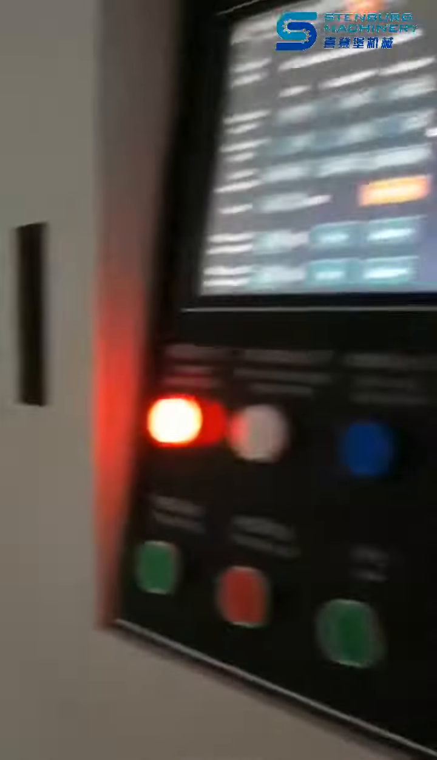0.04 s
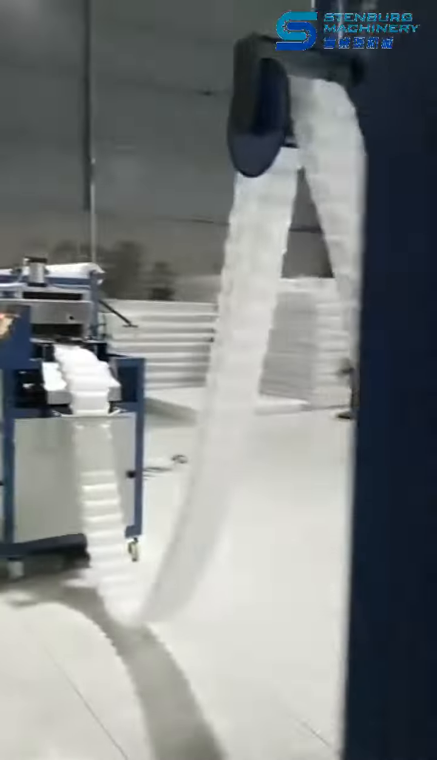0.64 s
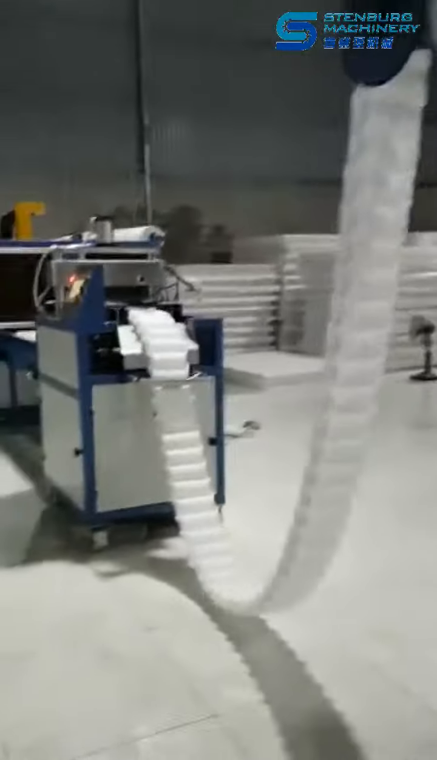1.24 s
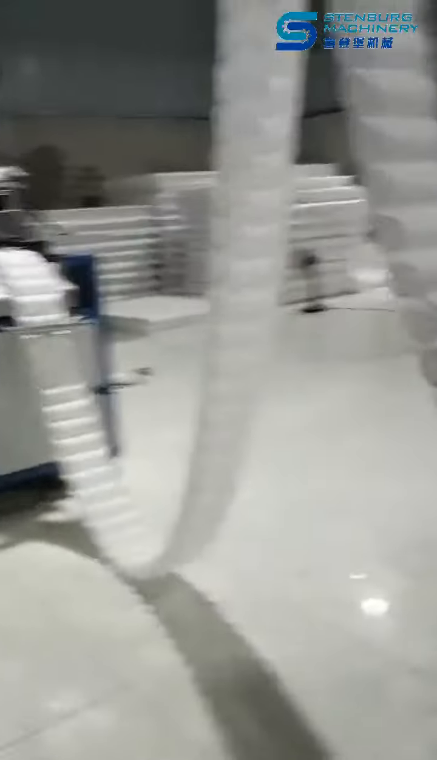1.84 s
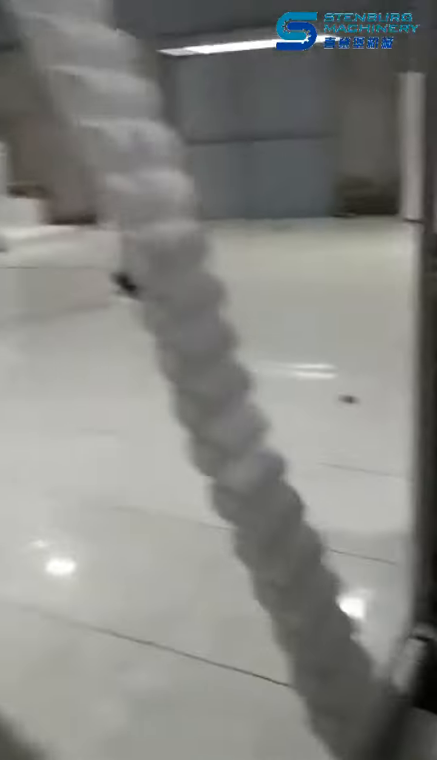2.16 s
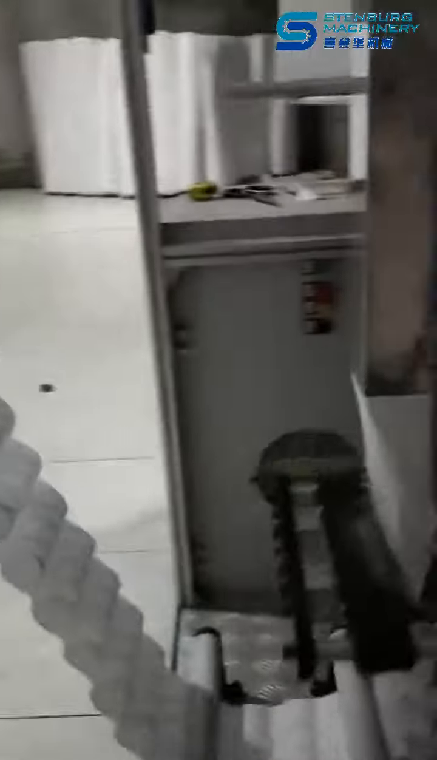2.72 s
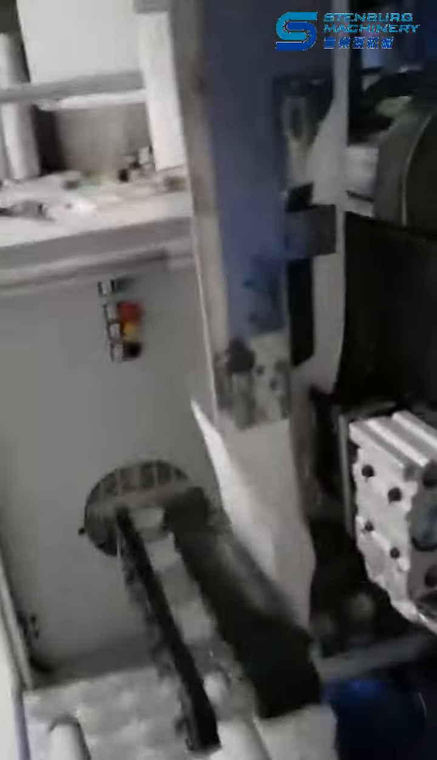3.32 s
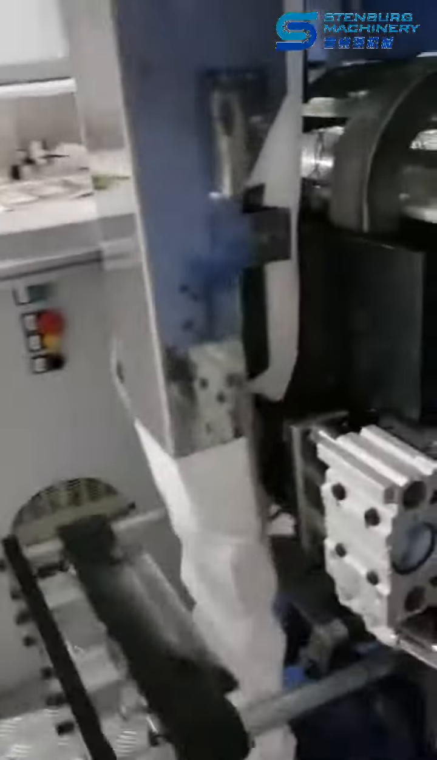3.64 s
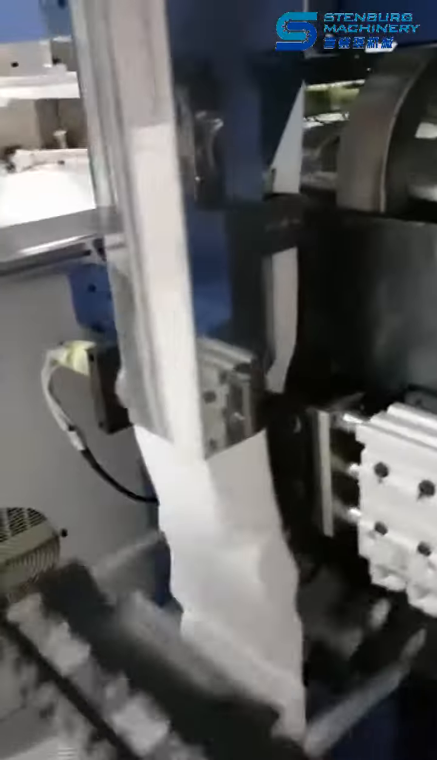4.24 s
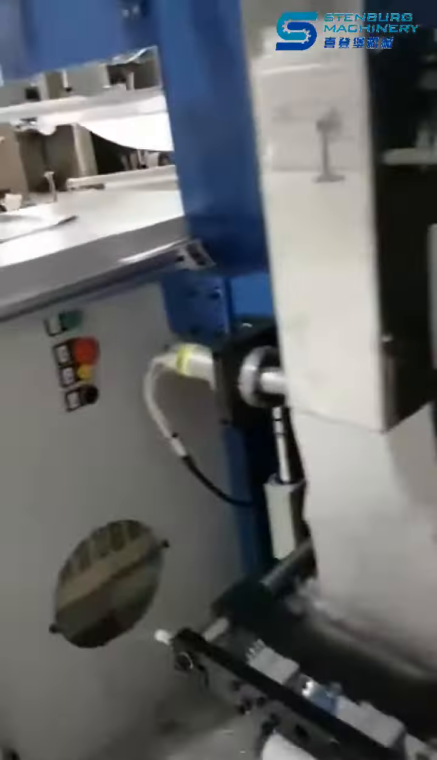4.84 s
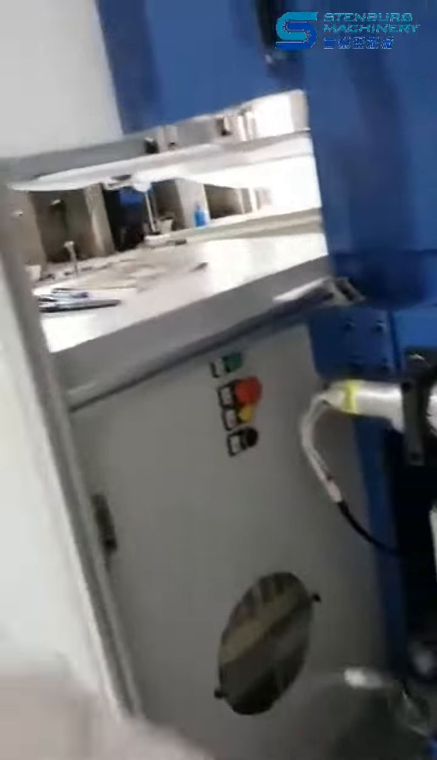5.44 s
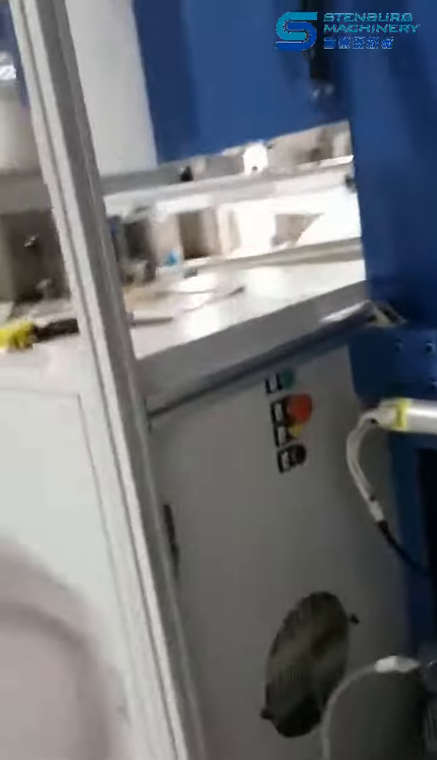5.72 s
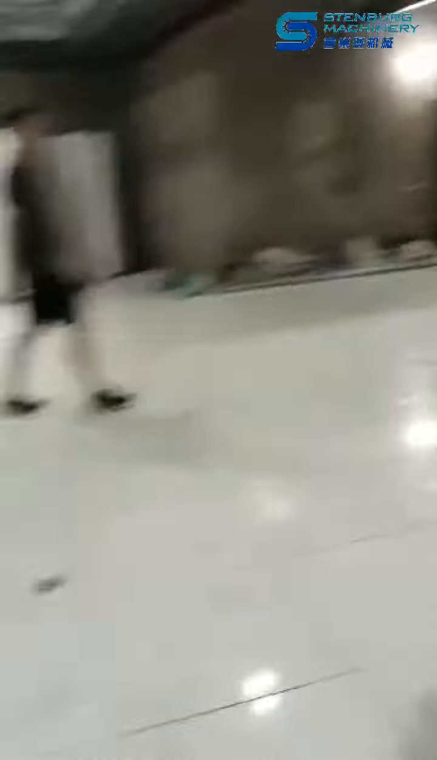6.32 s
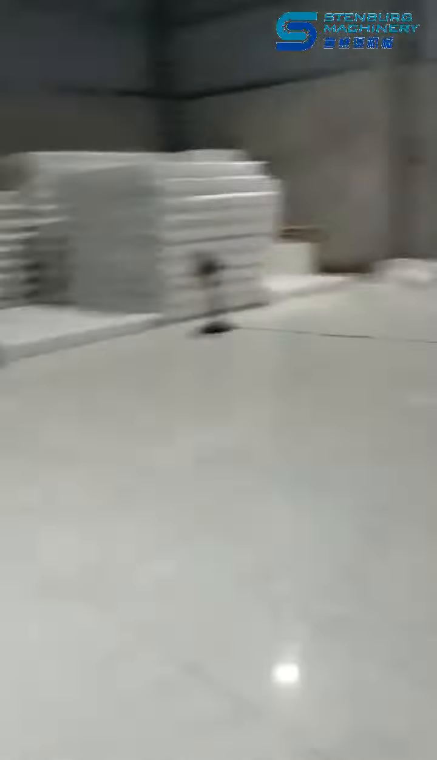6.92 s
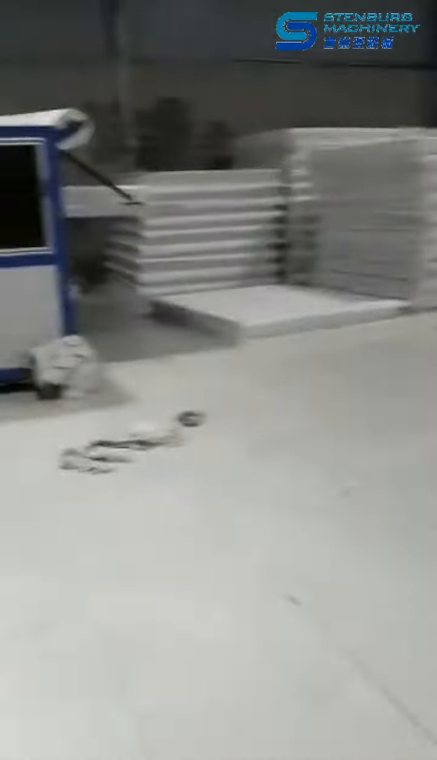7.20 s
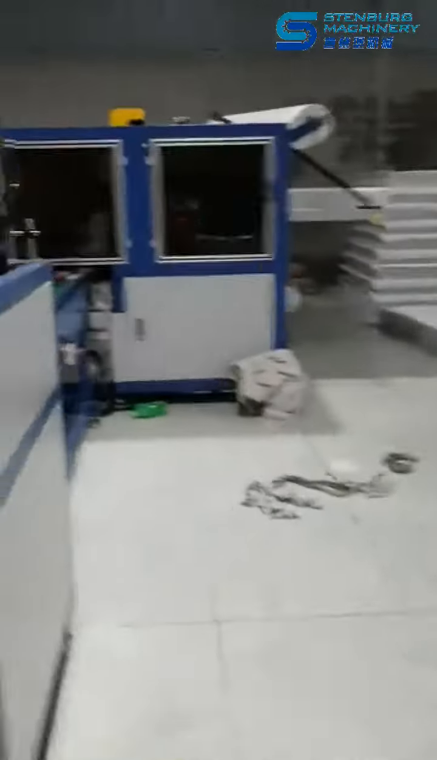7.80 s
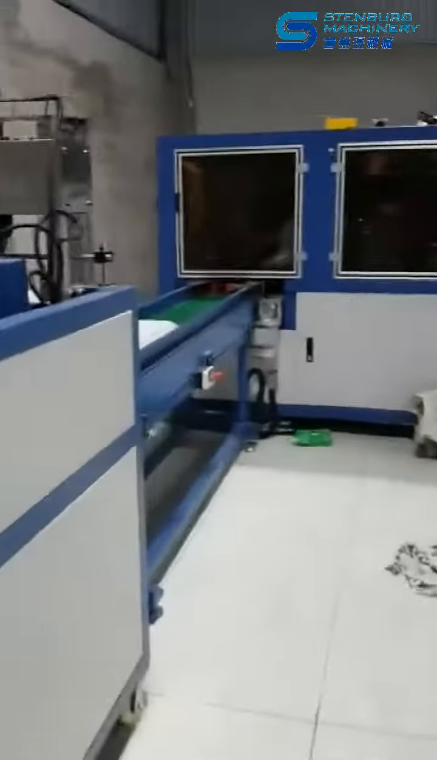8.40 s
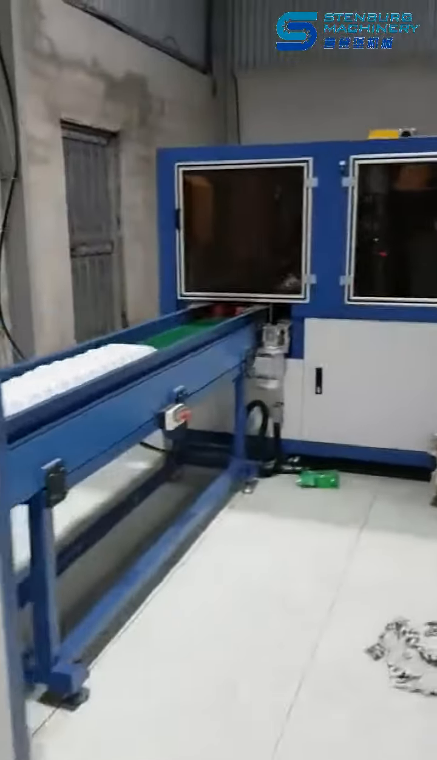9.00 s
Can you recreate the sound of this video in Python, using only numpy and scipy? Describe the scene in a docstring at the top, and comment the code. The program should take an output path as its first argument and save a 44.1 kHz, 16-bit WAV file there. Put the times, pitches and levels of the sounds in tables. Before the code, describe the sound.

A production line thumps about three times a second over steady motor noise, with metallic clatter and short bursts of air.

```python
"""The din of a hard-walled factory hall, from two microphones 15 cm apart carried past a pocket-spring line.
Close by, chains and fabric rustle, panels drone and motors whine. About three times a second the drive
speeds up and stops, and the welding head thuds on the frame and rolls around the hall. Valves puff air,
and on about every second stroke a spring clacks into its steel chute. Farther along, the bass flutters
after the strokes, thin chirps poke through the treble and a few footfalls boom on the concrete."""
import sys
import numpy as np
from scipy import signal
from scipy.fft import rfft, irfft, next_fast_len
from scipy.io import wavfile
from scipy.ndimage import uniform_filter1d

SR = 44100
rng = np.random.default_rng(int(sys.argv[2]) if len(sys.argv) > 2 else 0)


def to_wav(s):
    """Save 16-bit WAV."""
    ch = np.atleast_2d(s).T  # columns
    pcm = np.round(np.clip(ch, -1, 1) * 32767)  # PCM
    wavfile.write(sys.argv[1], SR, pcm.astype(np.int16))


N = 399546
TIME = np.arange(N) / SR
FFT_SIZE = 1024
BIN_HZ = np.maximum(np.arange(FFT_SIZE // 2 + 1) * SR / FFT_SIZE, 20)
MIC_SPACING_M, HALL_T60_S = .15, 0.88
LEAVE_PANEL_S, LEAVE_HEAD_S = (1.43, 1.8), (4.3, 5.5)   # walking off from control panel and welding head
CYCLE_S, FIRST_CYCLE_S, STOPS_S = .684, .495, (0.302, 0.68)   # the drive stops twice in each cycle
DRIVE_EFFORT, FEED_EFFORT = (0.94, 0.59), (1, 0.8)   # stroke one pulls the fabric, two brings the spring
LEAD_S = .07   # from the start of a swell to its height

# Levels in the tables are relative; each source sets its own gain on top.
# loudness along the walk: time_s, rumble_db, drone_db, feed_db
WALK_LEVELS = [(0.0, -37.5, -32.5, -32), (0.6, -39, -33, -33.5), (1.25, -41.5, -30.5, -34),
               (1.7, -45, -41, -38.5), (2.4, -47, -38.5, -41.5), (3.5, -47.5, -41, -43.5),
               (4.4, -49, -44.5, -44.5), (5.3, -53.5, -41.5, -45), (6.0, -53, -45.5, -47.5),
               (6.55, -51, -44, -45.5), (7.05, -52, -44.5, -44.5), (7.6, -47.5, -40.5, -41.5),
               (8.6, -47, -40.5, -37.5), (9.06, -46.5, -40, -39)]
# how far the nearest machine's strokes stand out of the din: time_s, presence_factor
STROKE_PRESENCE = [(0, 0.67), (0.7, 0.53), (1.4, 1.1), (2.2, 1.22), (3.4, 1.06), (4.5, 1.53), (6.0, 1.25),
                   (6.9, 0.74), (7.5, 0.32), (9.06, 0.65)]
# deeper rests after some strokes: centre_s, feed_db, frame_db, width_s
STROKE_LULLS = [(.26, -0.5, -1, 0.019), (.885, -1, 0, 0.02), (1.03, -3.5, -0.5, 0.093),
                (1.24, -1.5, 0.5, .02), (1.805, -2.5, -4, 0.017), (2.255, -5, -4.5, .02),
                (2.915, -2.5, 2.5, 0.029), (3.29, -1, -1, 0.019), (3.6, -0.5, -2, .029),
                (4.3, 2, 1.5, 0.028), (4.66, -1, -2.5, 0.037), (4.965, -1.5, 2, .025),
                (5.33, -1, -4, 0.028), (5.68, -1.5, -2, 0.022), (6.03, -1, -0.5, 0.059),
                (6.69, -1, -2.5, 0.037), (7.03, -3.5, -0.5, 0.046), (7.72, -2.5, -3.5, 0.024),
                (8.41, -4, -2, 0.03)]
# low and high din beside the machine, out on the floor and down the line: frequency_hz, density_db
LOW_DIN_BESIDE = [(15, -54), (25, -31), (86, -13.5), (167, -10), (199, 10), (244, -13.5), (325, 1.5),
                  (381, -10.5), (468, -1.5), (584, -3.5), (652, -15), (814, -9.5), (954, -12), (1100, -10),
                  (1430, -51), (2420, -120)]
LOW_DIN_FLOOR = [(15, -51), (25, -26), (54, -26), (86, -14), (140, -4.5), (167, -5), (260, 0.5),
                 (296, -1.5), (330, -0.5), (387, -3), (460, 1), (593, -8.5), (752, -8), (814, -10),
                 (1100, -7), (1430, -46), (2420, -120)]
LOW_DIN_DOWN_LINE = [(15, -54), (25, -35), (75, -18.5), (113, -6), (172, -6.5), (205, -8.5), (250, -4.5),
                     (293, -0.5), (330, -3.5), (400, -1.5), (477, 0), (551, -3.5), (618, -7.5), (813, -8.5),
                     (957, -9), (1200, -13), (1560, -45)]
HIGH_DIN_BESIDE = [(500, -25), (850, 0), (1000, -0.5), (1200, -2), (1290, 0.5), (1850, -3), (2100, -0.5),
                   (2300, -4.5), (2640, -3.5), (2890, -8), (3400, -11.5), (4070, -5.5), (4660, -11),
                   (6170, -8.5), (7400, -12), (9620, -59), (16300, -120)]
HIGH_DIN_FLOOR = [(500, -27), (850, 12), (956, 3), (1140, -4.5), (1460, -5), (1840, -6), (1990, -3.5),
                  (2940, -11), (3190, -14), (4260, -10), (5590, -15.5), (6120, -12.5), (7400, -14),
                  (9620, -55.5), (16300, -120)]
HIGH_DIN_DOWN_LINE = [(470, -34), (800, 7), (1090, -8), (1840, -8), (2000, -7.5), (2670, -10),
                      (3190, -11.5), (4330, -10), (4630, -13.5), (4990, -11), (5630, -15), (6180, -12),
                      (7450, -16.5), (9680, -50), (16400, -120)]
# modes of the frame and its panels: pitch_hz, level_db, t60_s
PANEL_MODES = [(63.4, -25.5, 0.1), (114.5, -12, 0.58), (179, -12, 0.24), (202.3, -2.5, 0.13),
               (246, 0, 0.16), (338, 0, 0.066), (413, 3.5, 0.029), (459.6, 5.5, 0.04), (558, 2, 0.034),
               (672, 1, 0.031), (820, -1.5, 0.085)]
# motor and gear tones met on the walk: pitch_hz, level_db, wander_hz, nearest_s, width_s
MOTOR_TONES = [(84.5, -55.5, 3, 1.9, 1.6), (469.3, -56, 16, 5.0, 5.4), (456, -42, 5, 3.42, .09),
               (465, -45, 5, 2.77, .1), (805, -58, 4.6, 1.1, 3.7), (1468, -51.5, 6.3, 0.52, 1.1),
               (1464, -60, 6, 4.2, 1.2), (476, -40, 14, 2.5, .05), (462, -44, 16, 3.8, .06),
               (329, -46.5, 11, 1.55, .7), (476, -37, 9, 1.05, .2), (6130, -58, 90, 7.9, 1.3)]
# welding head blows and the drive's load before each: peak_s, level_db, rise_s, decay_s, pitch_hz, load_db
WELD_BLOWS = [(0.08, -27, 0.0066, 0.044, 139, 0), (0.468, -19.5, 0.012, 0.015, 217, 2),
              (0.747, -23.5, 0.0026, 0.021, 214, -0.5), (1.157, -21.5, 0.0031, 0.026, 220, -0.5),
              (1.379, -26, 0.0028, 0.0093, 440, -4), (1.445, -25.5, 0.0079, 0.023, 344, -3),
              (1.862, -27.5, 0.03, 0.016, 225, 5), (2.143, -30, 0.022, 0.023, 200, 0.5),
              (2.496, -33, 0.019, 0.013, 453, 0), (2.841, -37, 0.013, .014, 181, -4),
              (3.192, -32, 0.0071, 0.0089, 300, -0.5), (3.504, -33.5, 0.026, 0.025, 246, -2),
              (3.903, -31.5, 0.003, 0.0048, 850, 1.5), (4.207, -36, 0.017, 0.011, 210, -3),
              (4.555, -32, 0.01, 0.012, 423, 0.5), (4.887, -37, 0.029, 0.023, 176, -4),
              (5.242, -29.5, .006, 0.0056, 536, 1.5), (5.555, -37, 0.0041, 0.022, 308, -0.5),
              (5.924, -30, 0.0058, 0.0041, 397, 4), (6.234, -34, 0.016, 0.019, 330, -1),
              (6.603, -50, .01, 0.0061, 480, 6), (6.915, -34, 0.0027, 0.0073, 404, 0),
              (7.305, -34, 0.013, 0.03, 397, 1.5), (7.578, -31.5, 0.0037, 0.015, 387, 1),
              (8.013, -33.5, 0.0063, 0.019, 368, 1.5), (8.28, -31, 0.0067, .01, 320, 3),
              (8.616, -39, 0.0064, .012, 367, 3.5)]
# rasps as a valve vents or the fabric is jerked on: peak_s, level_db, width_s
AIR_PUFFS = [(0.125, -27.5, 0.014), (0.615, -30.5, 0.023), (1.985, -33, 0.018), (2.15, -47, 0.018),
             (2.66, -35.5, 0.014), (3.355, -41, 0.014), (3.49, -37, 0.035), (3.932, -44, 0.011),
             (4.035, -34, 0.01), (4.145, -40, 0.022), (4.606, -44, 0.0073), (4.545, -40, 0.018),
             (4.715, -41, 0.012), (4.87, -40, 0.033), (5.405, -44, .016), (5.72, -46, 0.013),
             (5.812, -53, .01), (6.085, -44, 0.011), (6.4, -43.5, 0.031), (7.645, -40, .013)]
# chain carriers knocking on a panel: peak_s, level_db, pitch_hz
CARRIER_KNOCKS = [(0.318, -30.5, 584), (0.478, -30, 800), (0.700, -29, 587), (0.347, -31.5, 457),
                  (0.438, -28, 468), (1.118, -28, 458), (1.620, -36.5, 242), (1.833, -29.5, 300),
                  (1.942, -31, 322), (2.098, -33, 430), (2.555, -35, 272), (2.823, -34.5, 470),
                  (4.820, -38, 430), (5.125, -40.5, 240), (5.164, -41, 450), (5.546, -33, 489),
                  (5.797, -38, 484), (6.462, -38.5, 500), (6.606, -38, 446), (7.470, -41, 333),
                  (7.965, -41, 215), (8.116, -35.5, 473), (8.245, -41, 200), (8.769, -35, 533)]
# springs landing in the chute: start_s, length_s, scrape_db, then three pairs of pitch_hz, level_db
SPRING_LANDINGS = [(0.496, 0.042, -32.5, 2100, -39, 4170, -40, 7200, -36),
                   (1.168, 0.032, -32, 2020, -37, 2500, -49, 3563, -41),
                   (1.285, 0.028, -35.5, 2180, -38, 2480, -48, 4080, -40),
                   (1.573, 0.045, -38, 2174, -37, 3530, -43, 3980, -41),
                   (1.856, 0.022, -29.5, 2029, -39, 3610, -33, 4480, -35.5),
                   (2.543, 0.017, -32.5, 3610, -31.5, 2020, -41.5, 4370, -42),
                   (3.23, .014, -33, 2570, -42, 3630, -37.5, 4040, -41),
                   (3.922, 0.011, -41.5, 1450, -47, 3220, -48, 3730, -49),
                   (4.602, 0.008, -40.5, 1884, -46, 2440, -44, 6438, -61),
                   (5.274, 0.023, -44, 2030, -45, 2900, -53, 7150, -46),
                   (5.938, 0.0067, -62, 3730, -54, 3800, -46, 4000, -52),
                   (5.966, 0.011, -44.5, 820, -43, 2160, -50, 7200, -50.5),
                   (6.653, 0.0084, -56, 3900, -56, 6650, -50, 6850, -52),
                   (7.33, 0.026, -39.5, 980, -42, 2210, -43, 3601, -49),
                   (8.013, 0.027, -43, 2030, -48, 3680, -45, 6200, -51),
                   (8.707, 0.023, -40, 2050, -47, 2550, -45, 4130, -50)]
# modes of the steel chute: pitch_hz, level_db, t60_s
CHUTE_MODES = [(2030, -5, .04), (2540, -6, .04), (2950, -6, .04), (3620, -3, .04), (3780, -4, .04),
               (4110, -2, .04), (4320, -5, .035), (4540, -5, .035), (6680, -6, .04), (7100, -3, .04),
               (7330, -3, .04)]
# bass flutter along the walk: time_s, level_db
FLUTTER_LEVELS = [(0, -77.5), (1.3, -68.5), (1.58, -61), (2.4, -50), (2.9, -50.5), (5.1, -50.5), (5.7, -53),
                  (6.3, -54), (7.1, -67), (7.8, -79), (9.06, -50)]
# thin chirps as some strokes end: peak_s, level_db, pitch_hz, left_minus_right_db
HIGH_CHIRPS = [(2.866, -59, 8040, 25), (3.542, -57, 7900, -5), (4.574, -54, 7900, -24),
               (6.274, -63, 8000, 7), (6.622, -67, 7860, 6)]
# heavy steps on the concrete: start_s, level_db
FOOTFALLS = [(4.2, -51), (5.57, -54), (5.944, -55)]


def from_db(db):
    """Decibels to gain."""
    return 10 ** (np.asarray(db) / 20)


def unit_rms(x):
    """Scale to unit power."""
    return x / np.sqrt(np.mean(x ** 2) + 1e-20)


def unit_peak(x):
    """Scale so that the loudest 10 ms have unit power."""
    return x / np.sqrt(uniform_filter1d(np.mean(x ** 2, 0), size=441).max())


def gains(rows):
    """Each dB column of a curve as a gain per sample."""
    time_s, *columns = np.transpose(rows)
    return [from_db(np.interp(TIME, time_s, db)) for db in columns]


def spectrum(points):
    """A gain per frequency bin, read between points on a log axis."""
    hz, db = np.transpose(points)
    return from_db(np.interp(np.log(BIN_HZ), np.log(hz), db))


def band(x, low_hz, high_hz, order=2):
    """Causal band-pass."""
    return signal.sosfilt(signal.butter(order, [low_hz, high_hz], "band", fs=SR, output="sos"), x)


def low_pass(x, edge_hz):
    """A steep edge in the treble."""
    return signal.sosfilt(signal.ellip(14, .1, 80, edge_hz, fs=SR, output="sos"), x)


def add(out, start_s, sound):
    """Mix a sound in at start_s."""
    start = max(round(start_s * SR), 0)
    out[:, start:start + sound.shape[1]] += sound[:, :N - start]


def bell(age_s, width_s):
    """A smooth bump, 1 at age zero."""
    return np.exp(-(age_s / width_s) ** 2 / 2)


def burst(decay_s, rise_s):
    """A quarter second of contact force that builds quickly and dies away."""
    age = TIME[:SR // 4]
    return (1 - np.exp(-age / rise_s)) * np.exp(-age / decay_s)


def swell(rise_s, decay_s):
    """An envelope that builds roundly to its height LEAD_S in, then dies away."""
    age = TIME[:SR // 3] - LEAD_S
    return bell(np.minimum(age, 0), rise_s) * np.exp(-np.maximum(age, 0) / decay_s)


def wobble(points):
    """Drift of unit spread through random points spaced along the walk."""
    return unit_rms(np.interp(TIME, np.linspace(0, TIME[-1], points), rng.standard_normal(points)))


def diffuse(size=N):
    """Noise from all sides: alike at both microphones in the bass, unrelated in the treble."""
    padded = next_fast_len(size)
    hz = np.arange(padded // 2 + 1) * SR / padded
    alike = .975 * np.sinc(2 * hz * MIC_SPACING_M / 343)
    mid, side = rfft(rng.standard_normal((2, padded)))
    pair = np.sqrt(1 + alike) * mid + np.sqrt(1 - alike) * side * [[1], [-1]]
    return irfft(pair, padded)[:, :size] / np.sqrt(2)


def ring(force, modes):
    """Drive a set of decaying modes, with alternating signs."""
    out = 0
    for k, (hz, db, t60_s) in enumerate(modes):
        radius, angle = from_db(-60 / (t60_s * SR)), 2 * np.pi * hz / SR
        drive = [0, np.sin(angle) * np.sqrt(1 - radius ** 2)]
        feedback = [1, -2 * radius * np.cos(angle), radius ** 2]
        out = out + (-1) ** k * from_db(db) * signal.lfilter(drive, feedback, force + 1e-18)
    return out


def contacts(per_s, spread_db):
    """Random knocks, each reaching the two microphones from its own direction."""
    out, at = np.zeros((2, N)), np.flatnonzero(rng.random(N) < per_s / SR)
    strength = from_db(spread_db * np.minimum(rng.exponential(1, len(at)), 3))
    strength *= rng.choice([-1, 1], len(at))
    lag = (rng.uniform(-1, 1, len(at)) * MIC_SPACING_M / 343 * SR).astype(int)
    out[0, at], out[1, np.clip(at + lag, 0, N - 1)] = strength, strength
    return out


def tapped(force, at_s, rub_db):
    """One clean tap, with the rubbing contact under it."""
    tap = np.zeros(force.shape)
    tap[:, int(at_s * SR)] = 1
    return tap + from_db(rub_db) * force / np.sqrt(np.sum(force ** 2) / 2)


def presence():
    """How clearly the nearest machine stands out, per sample."""
    return np.interp(TIME, *np.transpose(STROKE_PRESENCE))


def since(moment_s):
    """Time from the nearest recurrence of a moment in the cycle; negative before it."""
    return (TIME - FIRST_CYCLE_S - moment_s + CYCLE_S / 2) % CYCLE_S - CYCLE_S / 2


def after_stop(lag_s, width_s):
    """A smooth bump shortly after each stop of the drive."""
    return sum(bell(since(stop_s) - lag_s, width_s) for stop_s in STOPS_S)


def surge(efforts, swing_db, lead_s, rise_s, fall_s):
    """Gain over the strokes: it builds from lead_s before the drive stops, holds, then falls away."""
    effort = 0
    for stop_s, strength in zip(STOPS_S, efforts):
        age = since(stop_s)
        stroke = np.clip((age + lead_s) / rise_s, 0, 1) * np.clip(1 - age / fall_s, 0, 1)
        effort = np.maximum(effort, strength * stroke)
    return from_db(swing_db * presence() * (effort - effort.mean()))


def lulls():
    """Level shifts in dB during the rests between strokes, for the feed and for the frame."""
    return sum(np.outer([feed_db, frame_db], bell(TIME - centre_s, width_s))
               for centre_s, feed_db, frame_db, width_s in STROKE_LULLS)


def din(colours, edges_hz, patchy_db, patch_hz, patch_s):
    """Adjoining bands of hall noise at unit power; the colour shifts on the walk, and over it the level
    flickers in small patches of time and pitch."""
    _, time_s, cells = signal.stft(diffuse(), SR, nperseg=FFT_SIZE)
    place = np.interp(time_s, [*LEAVE_PANEL_S, *LEAVE_HEAD_S], [0, 1, 1, 2])
    colour = sum(np.outer(unit_rms(spectrum(points)), np.maximum(1 - abs(place - k), 0))
                 for k, points in enumerate(colours))
    steps = np.arange(-12, 13)
    blur = np.outer(np.exp(-(steps * BIN_HZ[1] / patch_hz) ** 2),
                    np.exp(-(steps * time_s[1] / patch_s) ** 2))
    patches = unit_rms(signal.fftconvolve(rng.standard_normal(colour.shape), blur, "same"))
    closeness = np.sqrt(np.clip(np.interp(time_s, TIME, presence()), 0, 1))
    cells = cells * colour * from_db(patchy_db * closeness * np.minimum(patches, 1.2))
    for low_hz, high_hz in zip(edges_hz, edges_hz[1:]):
        inside = (BIN_HZ >= low_hz) & (BIN_HZ < high_hz)
        part = signal.istft(cells * inside[:, None], SR, nperseg=FFT_SIZE)[1][:, :N]
        yield part / np.sqrt(uniform_filter1d(np.mean(part ** 2, 0), size=2600) + 1e-20)


def drive_load(run_up_s=0.092):
    """Gain of panels and motors as the drive gathers speed; some strokes pull harder than others."""
    peak_s, *_, load_db = np.transpose(WELD_BLOWS)
    _, lull_db = lulls()
    level_db = np.interp(TIME, peak_s - run_up_s, load_db) + 1.1 * wobble(points=250)
    level_db += lull_db - 1.4 * after_stop(lag_s=.06, width_s=0.019)
    return from_db(level_db) * surge(DRIVE_EFFORT, swing_db=5.0, lead_s=0.32, rise_s=0.24, fall_s=0.084)


def frame():
    """Low din of the drive, heaviest as it brakes, with the lighter panels knocking in it."""
    rumble, drone, _ = gains(WALK_LEVELS)
    _, lull_db = lulls()
    braking = surge(DRIVE_EFFORT, swing_db=7.0, lead_s=0.088, rise_s=.06, fall_s=0.046)
    low, middle = din((LOW_DIN_BESIDE, LOW_DIN_FLOOR, LOW_DIN_DOWN_LINE), edges_hz=(0, 280, 950),
                      patchy_db=3.0, patch_hz=40, patch_s=0.038)
    knocks = unit_rms(band(ring(contacts(per_s=130, spread_db=0), PANEL_MODES), 330, 900))
    panels = from_db(-0.5) * middle + from_db(-8.5) * knocks
    return from_db(lull_db + 0.54) * rumble * braking * low + drone * drive_load() * panels


def motors():
    """Each tone wanders and trembles, surges with the load and swells as the microphones pass its motor."""
    out = 0
    for hz, db, wander_hz, nearest_s, width_s in MOTOR_TONES:
        phase = 2 * np.pi * np.cumsum(hz + wander_hz * wobble(points=300)) / SR
        mic_phase = np.array([[0], [min(hz / 700, 1.5)]])
        level = from_db(db + 1.8 * wobble(points=130) + 2.7 * wobble(points=900))
        passing = np.exp(-((TIME - nearest_s) / width_s) ** 2)
        out = out + level * passing * np.sqrt(2) * np.sin(phase + mic_phase)
    return drive_load() * out


def jingle(low_hz, high_hz, per_s, t60_s, parts):
    """Loose steel parts, each with its own pitch, knocked at random."""
    pitches_hz = np.linspace(low_hz, high_hz, parts) * rng.uniform(1.0, 1.03, parts)
    return unit_rms(sum(ring(contacts(per_s, spread_db=1.0), [(hz, 0, t60_s)]) for hz in pitches_hz))


def rattles(per_s, spread_db):
    """Loose springs and chain links chatter briefly, each at two damped pitches of its own."""
    out = np.zeros((2, N))
    for when, low, high, size, length in rng.random((int(per_s * N / SR), 5)):
        envelope = burst(decay_s=0.0062 + 0.013 * length, rise_s=.008)[:SR // 16]
        force = rng.standard_normal((2, SR // 16)) * envelope
        modes = [(1200 * 3.2 ** low, 0, .03), (2400 * 3 ** high, -2.0, .025)]
        strength = from_db(spread_db * min(-np.log(1 - size), 2.5))
        add(out, when * N / SR, strength * ring(force, modes))
    return unit_rms(out)


def feed():
    """Chains and springs tick and jingle in the hiss of air and sliding fabric, easing between strokes."""
    _, _, nearness = gains(WALK_LEVELS)
    lull_db, _ = lulls()
    pause = presence() * after_stop(lag_s=0.06, width_s=0.029)
    running = nearness * from_db(0.53 * wobble(points=400) - 2.84 * pause + lull_db)
    middle, high = din((HIGH_DIN_BESIDE, HIGH_DIN_FLOOR, HIGH_DIN_DOWN_LINE), edges_hz=(950, 3000, 8000),
                       patchy_db=5.5, patch_hz=85, patch_s=.034)
    ticks = unit_rms(band(contacts(per_s=220, spread_db=0.5), 1200, 5300))
    coils = jingle(3100, 6900, per_s=5, t60_s=.06, parts=14)
    links = presence() * rattles(per_s=80, spread_db=1.5)
    clatter = from_db(-2.0) * middle + from_db(-11.5) * ticks + from_db(-5.5) * links
    clatter *= surge(FEED_EFFORT, swing_db=2.5, lead_s=0.16, rise_s=0.13, fall_s=0.12)
    hiss = from_db(-3.0) * high + from_db(-14.0) * coils
    hiss *= surge(FEED_EFFORT, swing_db=3.0, lead_s=0.26, rise_s=0.22, fall_s=0.035)
    return running * (clatter + hiss)


def panel_blow(rise_s, decay_s, pitch_hz, note_db):
    """A blow shakes all the panels, and the one that it hits rings out."""
    force = diffuse(SR // 3) * swell(rise_s, decay_s)
    note = ring(tapped(force, LEAD_S, rub_db=-5.5), [(pitch_hz, 0, .05)])
    return unit_peak(unit_peak(ring(force, PANEL_MODES)) + from_db(note_db) * unit_peak(note))


def welding_head():
    """The head thuds on the frame at the end of each stroke."""
    out = np.zeros((2, N))
    for peak_s, db, rise_s, decay_s, pitch_hz, _ in WELD_BLOWS:
        add(out, peak_s - LEAD_S, from_db(db - 4.0) * panel_blow(rise_s, decay_s, pitch_hz, note_db=0))
    return out


def hall(x):
    """The hard walls return a diffuse tail, 12 ms behind the direct sound."""
    age = TIME[:SR]
    tail = band(diffuse(SR), 100, 6600, order=1) * from_db(-60 * age / HALL_T60_S) * (age > .012)
    return signal.fftconvolve(x, tail / np.sqrt(np.sum(tail ** 2) / 2), axes=1)[:, :N]


def valves():
    """Exhaust air escapes in short bright puffs."""
    level = sum(from_db(db) * bell(TIME - peak_s, width_s) for peak_s, db, width_s in AIR_PUFFS)
    return from_db(-4.0) * level * unit_rms(band(diffuse(), 1400, 6600))


def chain_carriers():
    """The carriers knock lightly on the panels."""
    out = np.zeros((2, N))
    for peak_s, db, pitch_hz in CARRIER_KNOCKS:
        knock = panel_blow(rise_s=.006, decay_s=.006, pitch_hz=pitch_hz, note_db=4.5)
        add(out, peak_s - LEAD_S, from_db(db - 1.5) * knock)
    return out


def varied(modes, detune, spread_db):
    """No two springs land alike: each shifts the pitch and strength of the modes a little."""
    return [(hz * (1 + detune * sharp), db + spread_db * loud, t60_s)
            for (hz, db, t60_s), (sharp, loud) in zip(modes, rng.standard_normal((len(modes), 2)))]


def springs(rise_s=.002, note_t60_s=.05):
    """A spring strikes the chute and its coils scrape in; each note is set off by a coil of its own."""
    out = np.zeros((2, N))
    age = TIME[:SR // 4]
    for start_s, length_s, scrape_db, *notes in SPRING_LANDINGS:
        friction = diffuse(SR // 4) + 0.5 * rng.standard_normal(SR // 4)
        force = friction * (1 - np.exp(-age / rise_s)) * bell(age, length_s)
        scrape = unit_peak(band(force, 700, 5900))
        chute = unit_peak(ring(force, varied(CHUTE_MODES, detune=.003, spread_db=1.5)))
        clack = from_db(scrape_db) * unit_peak(scrape + from_db(-0.5) * chute)
        for hz, db in zip(notes[::2], notes[1::2]):
            coil = tapped(force, length_s * rng.uniform(.3, .55), rub_db=0)
            clack += from_db(db) * unit_peak(ring(coil, [(hz, 0, note_t60_s)]))
        add(out, start_s, clack)
    return out


def bass_flutter():
    """After each stroke the bass flutters briefly, in opposite polarity at the two microphones."""
    level, = gains(FLUTTER_LEVELS)
    bass = unit_rms(band(rng.standard_normal(N), 42, 300))
    return level * after_stop(lag_s=.055, width_s=0.032) * bass * [[1], [-1]]


def high_chirps():
    """Thin chirps above the rest of the treble, some far to one side."""
    out = np.zeros((2, N))
    for peak_s, db, hz, pan_db in HIGH_CHIRPS:
        noise = rng.standard_normal(SR // 3) * swell(rise_s=.011, decay_s=0.0086)
        chirp = band(noise, hz - 200, hz + 200) * from_db([[pan_db / 2], [-pan_db / 2]])
        add(out, peak_s - LEAD_S, from_db(db) * unit_peak(chirp))
    return out


def footfalls():
    """Only the dull boom of a step carries through the din."""
    out = np.zeros((2, N))
    for start_s, db in FOOTFALLS:
        boom = band(rng.standard_normal(SR // 4) * burst(decay_s=.05, rise_s=.01), 45, 85)
        add(out, start_s, from_db(db) * unit_peak(np.array([boom, boom])))
    return out


def centred_bass(x, corner_hz):
    """Below the corner the bass is made the same at both microphones."""
    mid, side = (x[0] + x[1]) / 2, (x[0] - x[1]) / 2
    side = signal.sosfiltfilt(signal.butter(3, corner_hz, "high", fs=SR, output="sos"), side)
    return np.array([mid + side, mid - side])


def scene():
    """Thuds and knocks roll around the hall; the clacks and puffs near the microphones stay dry."""
    blows = welding_head() + chain_carriers()
    line = blows + from_db(-10.5) * hall(blows)
    line = line + springs() + valves() + frame() + motors() + feed() + footfalls()
    return low_pass(centred_bass(line, corner_hz=215), edge_hz=7520) + bass_flutter() + high_chirps()


def record(dry):
    """A low cut at 22 Hz and a steep top cut on both microphones."""
    low_cut = signal.butter(2, 22, "high", fs=SR, output="sos")
    return low_pass(signal.sosfilt(low_cut, dry), edge_hz=8500)


dry = scene()
out = record(dry)
to_wav(out)
```